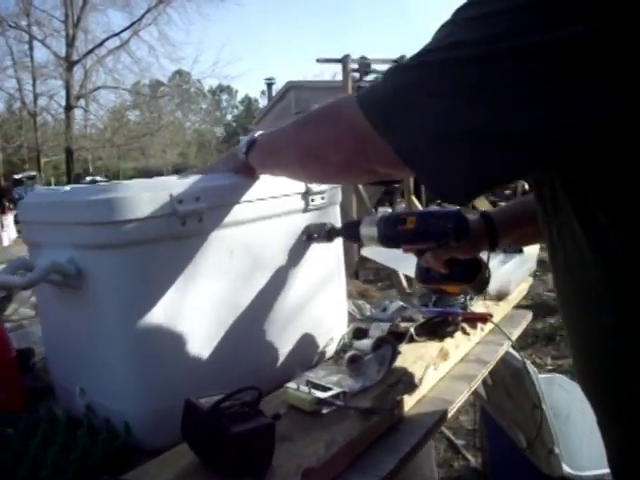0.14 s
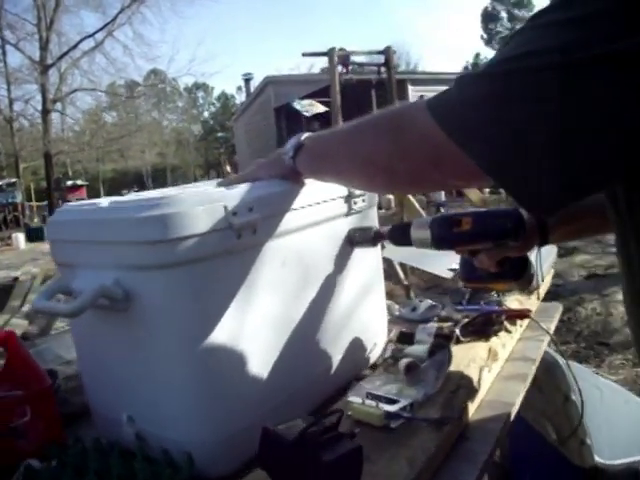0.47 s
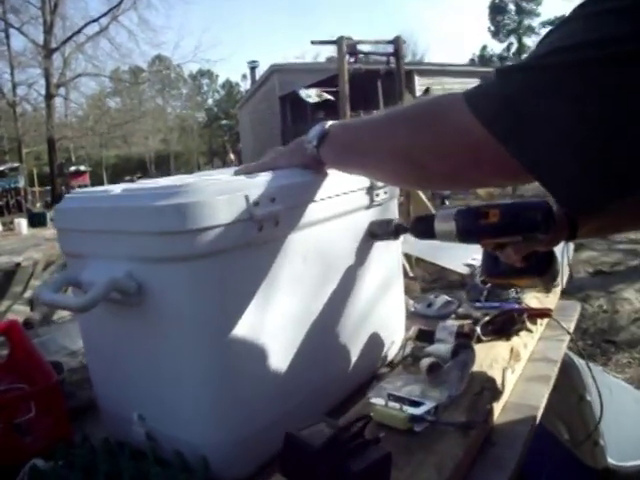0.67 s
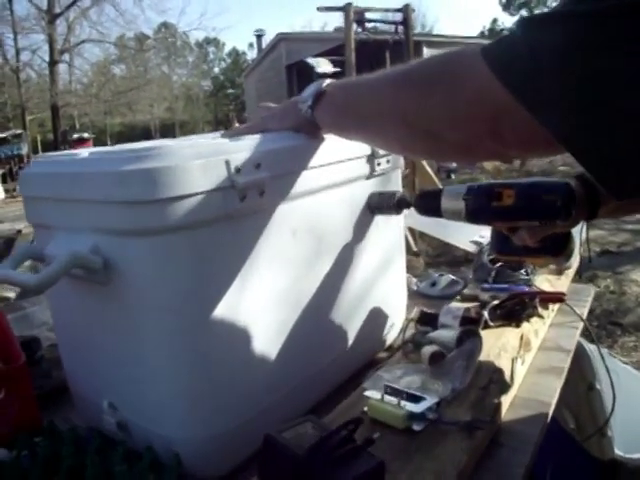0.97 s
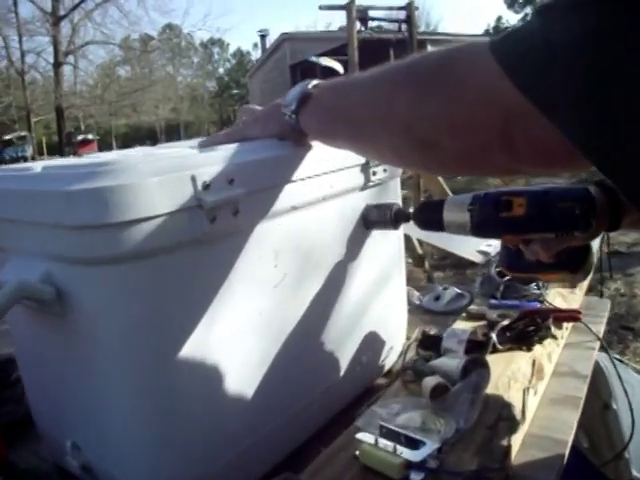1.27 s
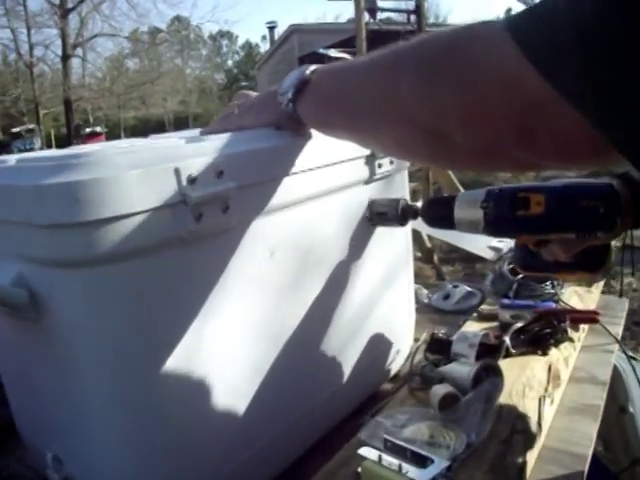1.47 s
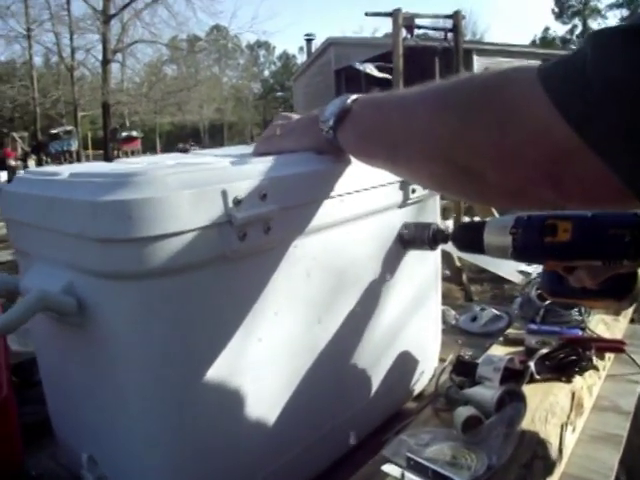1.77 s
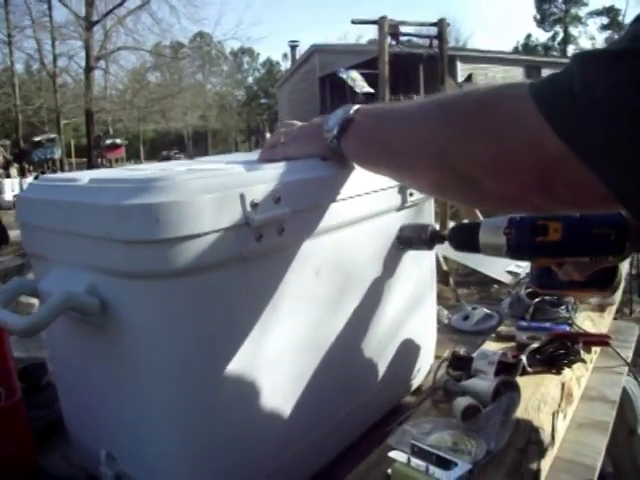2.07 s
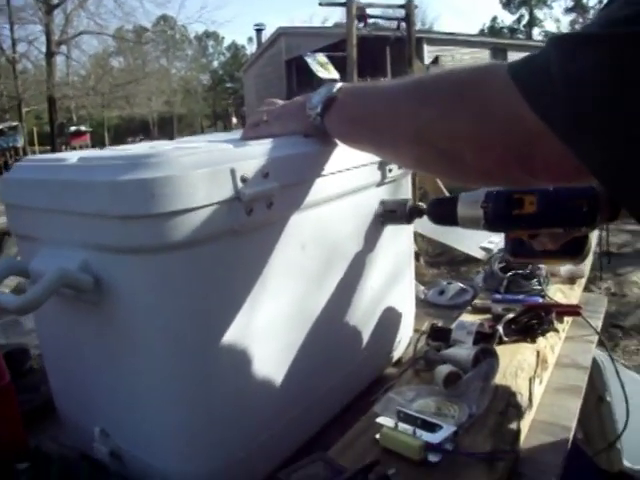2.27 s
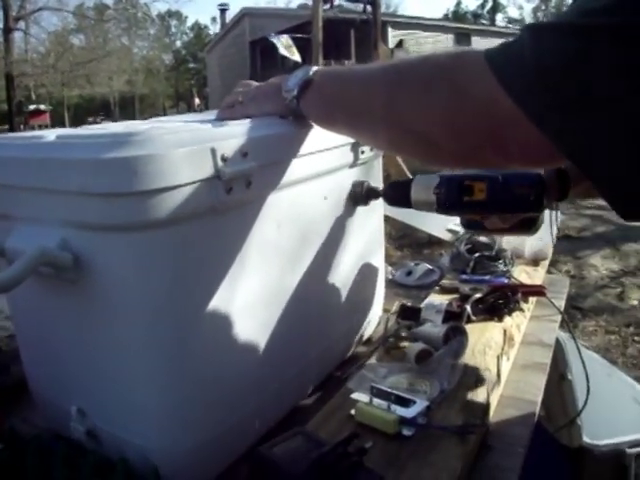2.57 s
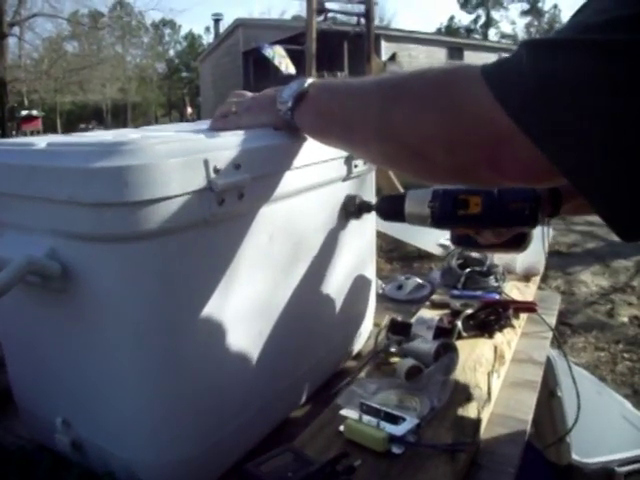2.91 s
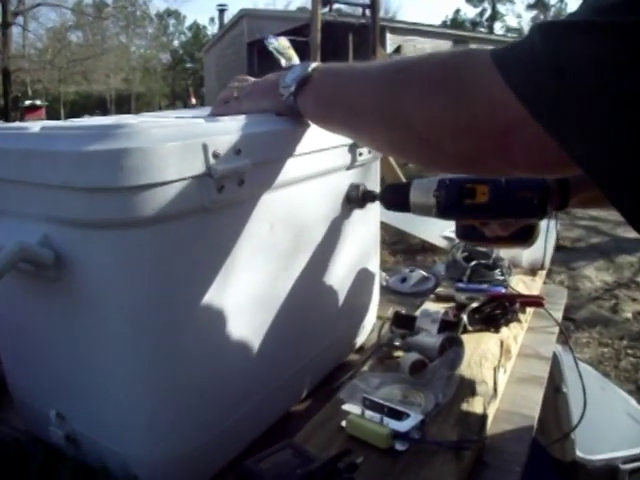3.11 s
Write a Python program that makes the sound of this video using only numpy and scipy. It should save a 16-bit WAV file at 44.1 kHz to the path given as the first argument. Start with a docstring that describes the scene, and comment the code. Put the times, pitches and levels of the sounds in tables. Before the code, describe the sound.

A cordless drill grinds a hole saw into a hollow plastic cooler, rasping and chattering as the motor whine rises and sags. Four short bursts start around 0.1, 0.4, 0.9 and 1.4 seconds, the last with a squeak. From 2.2 seconds it runs steadily, the plastic groaning at 2.5 and squealing briefly near 2.8. Outdoor wind buffets the dull-sounding microphone around 0.3 and 0.9 seconds.

```python
"""Outdoors, wind buffets the microphone of a small camera with a coarse sampling rate.
A cordless drill drives a hole saw into the wall of a plastic cooler in four short bursts: the teeth
rasp and chatter as the saw turns, the hollow wall drones, and the gears whine up and sag under load.
Between bursts the saw whirs down; it squeaks as the fourth begins. From 2.2 s the drill runs steadily
to the end, with a rough groan from the wall and then one brief squeal."""
import sys
import numpy as np
from scipy import signal
from scipy.fft import rfft, irfft
from scipy.io import wavfile
from scipy.ndimage import uniform_filter1d

SR = 44100
rng = np.random.default_rng(int(sys.argv[2]) if len(sys.argv) > 2 else 0)


def inscribe(sig):
    """Save sig as 16-bit PCM at rate SR to the path in sys.argv[1].

    A 1-D sig is mono; a 2-D sig holds one channel per row.
    Samples are clipped to [-1, 1] before scaling.
    """
    pcm = np.round(np.clip(np.atleast_2d(sig).T, -1, 1) * 32767)
    wavfile.write(sys.argv[1], SR, pcm.astype(np.int16))


N = 143325
T = np.arange(N) / SR


def amp(db):
    """Decibels to gain."""
    return 10 ** (np.asarray(db) / 20)


def unit(x):
    """Scales to rms 1."""
    return x / np.sqrt(np.mean(x ** 2) + 1e-20)


def curve(points):
    """Joins (seconds, value) points over the whole scene."""
    return np.interp(T, *np.transpose(points))


def colour(x, points):
    """Filters by an EQ curve of (Hz, dB) points; rms 1."""
    hz, db = np.transpose(points)
    freqs = np.fft.rfftfreq(N, 1 / SR)
    gain = amp(np.interp(np.log(freqs + 1), np.log(hz + 1), db))
    return unit(irfft(rfft(x) * gain, N))


def noise():
    """White noise."""
    return rng.standard_normal(N)


def drift(hz):
    """Random wander up to about this rate; rms 1."""
    return unit(irfft(rfft(noise()) / (1 + (np.fft.rfftfreq(N, 1 / SR) / hz) ** 4), N))


def ring(x, hz, width_hz):
    """One resonance; rms 1."""
    return unit(signal.lfilter(*signal.iirpeak(hz, hz / width_hz, SR), x))


def tone(hz):
    """A sine that follows a pitch curve; rms 1."""
    return np.sqrt(2) * np.sin(2 * np.pi * (np.cumsum(hz) / SR + rng.random()))


def swell(centre, length):
    """A smooth arch, timed in seconds."""
    return np.cos(np.pi * np.clip((T - centre) / length, -.5, .5))


# The outdoor bed. Each row: frequency in Hz, level in dB.
AIR_EQ = [(120, -11), (200, 3), (445, -9), (1300, -5.5), (2000, -2.5), (2790, -3), (5400, -25),
          (7020, -80.5)]


def open_air():
    """A faint, steady hiss of open air."""
    return amp(-31) * colour(noise(), AIR_EQ)


# The rumble's fader ride. Each row: time in seconds, level in dB.
WIND_RIDE = [(0.0, -16), (0.24, -16.5), (0.32, -9), (0.66, -27), (0.73, -17.5), (0.85, -23.5), (0.9, -9.5),
             (0.99, -31), (1.26, -20.5), (1.98, -31), (2.2, -17), (2.52, -38), (3.25, -41.5)]
# The rumble's colour. Each row: frequency in Hz, level in dB.
WIND_EQ = [(10, -13), (28, -4), (55, -9.5), (100, -15.5), (200, -26), (500, -59), (2000, -100)]
# Gusts on the microphone. Each row: centre and length in seconds, pitch in Hz, level in dB.
GUSTS = [(0.313, 0.14, 23.2, -12.5), (0.899, 0.058, 50, -4)]


def wind():
    """Wind on the microphone: low rumble and two hard buffets, the harder one with a dull pop."""
    rumble = amp(curve(WIND_RIDE)) * colour(noise(), WIND_EQ)
    buffets = sum(amp(db) * swell(centre, length) * np.sin(2 * np.pi * hz * (T - centre))
                  for centre, length, hz, db in GUSTS)
    pop = amp(-6) * swell(centre=.896, length=.0014) ** 2
    return rumble + buffets - pop


# Spin-downs and light rubs. Each row: start, attack and 60 dB decay time in seconds, level in dB.
RUB_CUES = [(0.313, 0.004, 0.083, -20), (.362, 0.0055, 0.13, -18), (0.744, 0.011, 0.36, -15),
            (1.3, 0.0073, 0.92, -29.5)]
# The whir's colour. Each row: frequency in Hz, level in dB.
RUB_EQ = [(500, -4.5), (1300, -27), (2200, -1), (2900, 5), (3300, -4), (4000, -31), (5400, -29)]


def rubbing():
    """The unloaded saw whirs in its groove and dies away."""
    level = sum(np.clip((T - start) / rise, 0, 1) * amp(db - 60 * np.maximum(T - start - rise, 0) / t60)
                for start, rise, t60, db in RUB_CUES)
    return level * colour(noise(), RUB_EQ)


# Start-up squeaks. Each row: start and length in seconds, pitch in Hz, level in dB.
SQUEAK_CUES = [(1.402, 0.0379, 648, -11), (2.21, 0.0385, 962, -27)]


def squeak(start, length, hz, db):
    """The slow saw sticks and slips: a short, rising stack of harmonics."""
    harmonics_db = [-19.5, -4.5, 2, -3.5]
    bend = .22 * np.clip((T - start) / length - .5, -.5, .5)
    pitch = hz * (1 + bend + .055 * drift(hz=364))
    stack = sum(amp(part_db) * tone(k * pitch) for k, part_db in enumerate(harmonics_db, 1))
    return amp(db) * unit(stack) * np.sqrt(abs(swell(start + length / 2, length)))


# Two falling gear whines as the motor sags in the second burst, then a squeal in the steady run.
# Each row: centre and length in seconds, pitch in Hz, glide in Hz per second, level in dB.
FALLING_TONE_CUES = [(0.632, 0.05, 2600, -3000, -12), (.675, .06, 2200, -4500, -15),
                     (2.77, 0.12, 2840, -400, -15.5)]


def falling_tone(centre, length, hz, glide, db):
    """One rough, downward glide: the whine of the slowing gears, or a squeal."""
    pitch = hz + glide * (T - centre) + 35 * drift(hz=308)
    return amp(db) * swell(centre, length) * tone(pitch)


# Revs for the first three bursts, the fourth and the run. Each row: time in seconds, gear mesh in Hz.
BURST_REVS = [(.07, 700), (.135, 1880), (.18, 2470), (.21, 2630), (.25, 2530), (.28, 2350), (.32, 1400),
              (.41, 2400), (.61, 2620), (.7, 2020), (.75, 1600), (.92, 600), (.96, 1480), (1.0, 2000),
              (1.04, 2310), (1.15, 2580), (1.26, 2450), (1.31, 1500), (1.44, 600)]
FOURTH_BURST_REVS = [(1.47, 1200), (1.49, 1480), (1.5, 1850), (1.53, 2200), (1.555, 2370), (1.62, 2500),
                     (1.75, 2580), (1.97, 2597), (2.01, 2500), (2.07, 1900)]
RUN_REVS = [(2.2, 900), (2.25, 1600), (2.28, 2000), (2.345, 2350), (2.37, 2200), (2.4, 2300), (2.45, 2120),
            (2.5, 2190), (2.55, 2010), (2.64, 2372), (2.72, 2490), (2.82, 2440), (2.9, 2280), (3.0, 2230),
            (3.1, 2280), (3.25, 2400)]


def motor_speed():
    """The motor winds up and sags under load; gives the gear mesh rate in Hz."""
    return curve(BURST_REVS + FOURTH_BURST_REVS + RUN_REVS)


# Trigger pulls. Each row: start, end, fade-in and fade-out in seconds,
# then the levels of rasp, drone, growl, scrape and gears in dB.
TRIGGER_PULLS = [(0.067, 0.316, 0.079, 0.057, -11.5, -22, -37.5, -21, -23.5),
                 (0.39, 0.753, 0.047, 0.019, -10.5, -25.5, -31.5, -22.5, -28.5),
                 (0.921, 1.323, 0.0031, 0.043, -12.5, -23.5, -26.5, -26.5, -22),
                 (1.422, 2.094, 0.027, 0.052, -10.5, -24.5, -29, -26, -22),
                 (2.2, 3.3, 0.0077, 0.019, -11.5, -25.5, -24.5, -32.5, -20.5)]


def trigger():
    """Five gain curves, one for each drilling layer: every pull rises, holds and falls."""
    return sum(amp(levels_db)[:, None] * np.clip(np.minimum((T - start) / rise, (end - T) / fall), 0, 1)
               for start, end, rise, fall, *levels_db in TRIGGER_PULLS)


# Side tones of the gear train. Each row: multiple of the mesh rate, level in dB.
SIDE_TONES = [(.091, -8), (.273, -7), (.364, -9), (.645, -10), (.875, -8), (1.145, -4), (1.18, -1.5),
              (1.28, -7), (1.75, -7)]
# What the gearbox and wall radiate. Each row: frequency in Hz, gain in dB.
HOUSING_EQ = [(300, -3), (480, -14), (580, -3), (870, 0), (940, -9), (1100, -8), (1450, -3), (2200, 2.5),
              (2550, -2), (2900, 4), (3500, -3), (4200, -5), (4500, -12), (4750, -21), (5200, -28)]


def gears(speed, level):
    """Mesh tone, octave and rough side tones sweep through the housing's resonances."""
    full_speed_hz, full_spin_up_hz_per_s = 2500, 7000
    mesh_hz = speed + 10 * drift(hz=80)

    def partial(order, db, flutter):
        """One gear tone with a fast flutter and a slower wobble in level."""
        waver = 1 + flutter * drift(hz=80) + .36 * drift(hz=20)
        housing_db = np.interp(order * speed, *np.transpose(HOUSING_EQ))
        return amp(db + housing_db) * tone(order * mesh_hz) * waver

    # The whine pushes forward while the motor speeds up.
    acceleration = uniform_filter1d(np.gradient(speed) * SR, size=round(.03 * SR))
    spin_up = np.clip(acceleration / full_spin_up_hz_per_s, 0, 1) ** 2
    whine = partial(.99, db=3.5 + 2.5 * spin_up, flutter=.36)
    octave = partial(2, db=-3 + 9.5 * spin_up, flutter=.36)
    sides = sum(partial(order, db, flutter=.55) for order, db in SIDE_TONES)
    return level * (whine + octave + sides) * (speed / full_speed_hz) ** 1.7


# The saw's chatter. Each row: multiple of the mesh rate, rms depth in dB.
CHATTER_PULSES = [(0.0153, 0.95), (.027, .5), (0.035, 0.5)]


def bite(speed):
    """How hard the teeth bite, in dB: it pulses unevenly with the turn of the saw."""
    pulses = sum(depth_db * tone(order * speed) for order, depth_db in CHATTER_PULSES)
    return pulses + 1.7 * drift(hz=109)


def teeth(bite_db):
    """The cutting force: snapping chips and steady scraping, both riding the bite."""
    chips_per_s, spread_db, chip_share = 2200, 2.2, .33
    chips = noise() * (rng.random(N) < chips_per_s / SR)
    chips *= amp(spread_db * np.minimum(rng.exponential(1, N), 3))
    grit = np.sqrt(chip_share) * unit(chips) + np.sqrt(1 - chip_share) * noise()
    return unit(grit * amp(bite_db))


# The wall flexing (drone) and under pressure (growl). Each row: frequency in Hz, level in dB.
DRONE_EQ = [(53, -33.5), (90, -6), (123, -3), (210, 4), (284, 0), (380, -5), (440, -21.5), (1000, -59.5)]
GROWL_EQ = [(250, -27), (450, -10.5), (560, -1.5), (680, 0.5), (870, -3), (980, -2), (1200, -4),
            (1560, -27.5), (2640, -81.5)]
# Booming groans. Each row: centre and length in seconds, pitch in Hz, level in dB.
GROAN_CUES = [(1.435, 0.012, 250, -15), (1.465, 0.029, 200, -17.5), (2.468, 0.15, 288, -19.5),
              (2.489, 0.25, 210, -15.5)]


def wall(force, bite_db, drone_level, growl_level):
    """The hollow plastic wall drones under the teeth, growls when pressed and now and then groans."""
    width_hz = 146
    drone = drone_level * colour(force, DRONE_EQ)
    growl = growl_level * colour(force, GROWL_EQ)
    groans = sum(amp(db) * swell(centre, length) * ring(ring(noise(), hz, width_hz), hz, width_hz)
                 for centre, length, hz, db in GROAN_CUES)
    roughness = unit(amp(1.06 * bite_db))
    return drone + growl + groans * roughness


# The bright edge of the cut. Each row: frequency in Hz, level in dB.
SCRAPE_EQ = [(2000, -50), (3100, -6.5), (3650, -0.5), (4100, -3), (4600, -16.5), (5400, -23)]


def scrape(bite_db, level):
    """Teeth skate on the surface: a hiss that pulses with the bite."""
    return level * colour(noise() * amp(bite_db), SCRAPE_EQ)


# The body of the cut. Each row: frequency in Hz, level in dB.
RASP_EQ = [(900, -35.5), (1240, -13), (1790, -2.5), (2440, -4.5), (2940, 2.5), (3440, -6.5), (4410, -18),
           (5400, -29.5), (7020, -65.5)]
# Teeth digging into the plastic. Each row: centre and length in seconds, level in dB.
CATCH_CUES = [(0.623, 0.023, -10), (0.743, 0.005, -10), (.926, .008, -6), (.98, .11, -12),
              (1.085, .008, -5), (1.146, .012, -3), (1.2, 0.014, -3), (1.252, 0.017, -8),
              (1.477, 0.0098, -6)]


def saw(force, bite_db, level):
    """The cut rasps and now and then catches; the steel cup rings most in hard bites."""
    cup_drive = colour(noise(), RASP_EQ) * amp(.66 * bite_db)
    cup = ring(cup_drive, hz=2825, width_hz=150)
    rasp = unit(colour(force, RASP_EQ) + amp(-12.5) * cup)
    catch_level = sum(amp(db) * swell(centre, length) for centre, length, db in CATCH_CUES)
    return level * rasp + catch_level * colour(noise(), RASP_EQ)


def scene():
    """Drill, cooler, wind and open air, mixed to mono."""
    speed = motor_speed()
    rasp_level, drone_level, growl_level, scrape_level, gear_level = trigger()
    bite_db = bite(speed)
    force = teeth(bite_db)
    drilling = saw(force, bite_db, rasp_level) + scrape(bite_db, scrape_level)
    drilling += wall(force, bite_db, drone_level, growl_level)
    drilling += gears(speed, gear_level)
    friction = rubbing() + sum(squeak(*cue) for cue in SQUEAK_CUES)
    glides = sum(falling_tone(*cue) for cue in FALLING_TONE_CUES)
    return (drilling + friction + glides + wind() + open_air())[None]


def record(dry):
    """The camera samples coarsely, overloads softly and dulls the top end."""
    step, ceiling, knee, soften, cutoff_hz = 4, .99, 4.5, .069, 15850
    coarse = signal.resample_poly(dry[0], 1, step)
    clipped = coarse / (1 + abs(coarse / ceiling) ** knee) ** (1 / knee)
    # Straight lines between the samples mirror the rasp into the treble.
    joined = np.interp(T, T[::step], clipped)
    dulled = np.convolve(joined, [soften, 1 - 2 * soften, soften], "same")
    lowpass = signal.firwin(511, cutoff_hz, window=("kaiser", 9), fs=SR)
    return signal.oaconvolve(dulled, lowpass, "same")[None]


dry = scene()
out = record(dry)
inscribe(out)
```